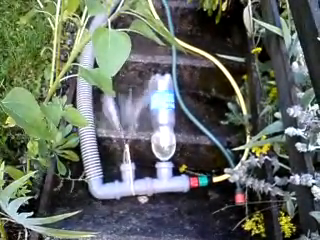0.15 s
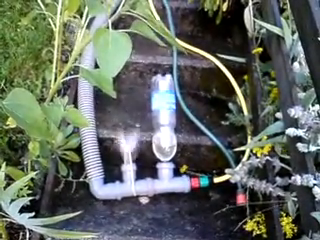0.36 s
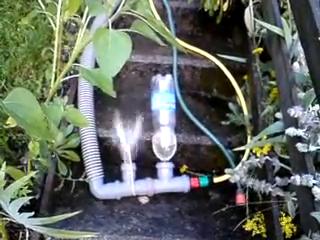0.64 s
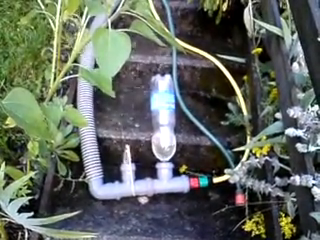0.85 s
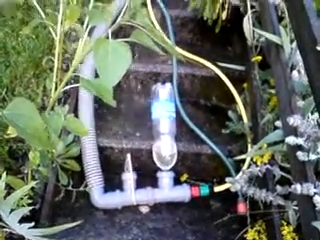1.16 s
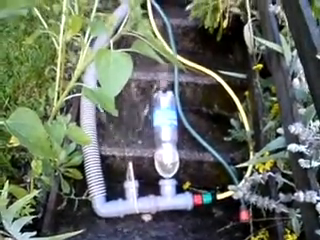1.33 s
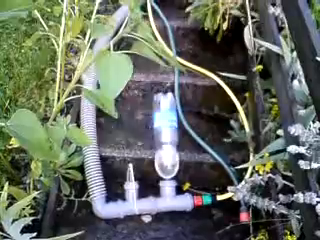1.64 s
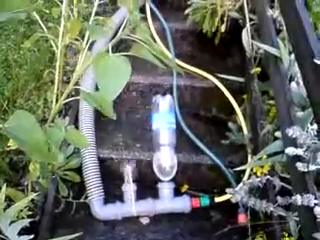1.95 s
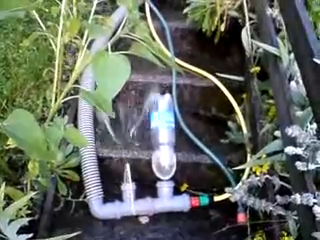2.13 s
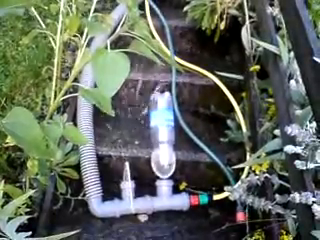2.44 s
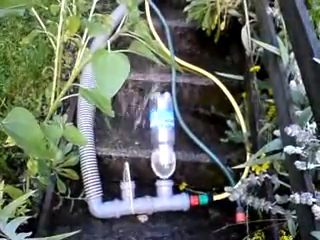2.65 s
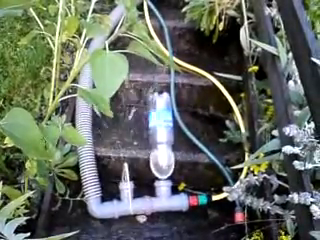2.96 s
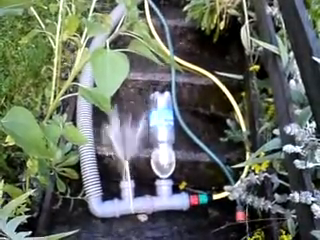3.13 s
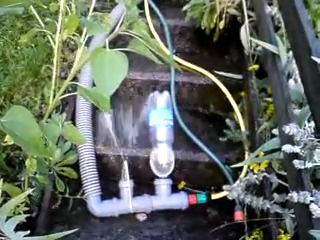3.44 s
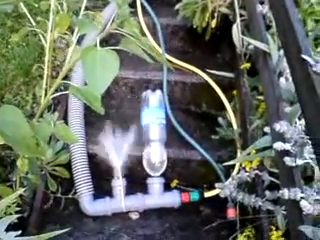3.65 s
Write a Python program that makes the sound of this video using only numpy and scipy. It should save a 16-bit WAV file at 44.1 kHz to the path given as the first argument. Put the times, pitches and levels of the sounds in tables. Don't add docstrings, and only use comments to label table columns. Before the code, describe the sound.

A small water ram pump clacks rapidly and steadily, spurting hissing water between each sharp knock

```python
import sys
import numpy as np
from scipy import signal
from scipy.fft import rfft, irfft
from scipy.io import wavfile
from scipy.ndimage import uniform_filter1d

SR = 44100
rng = np.random.default_rng(int(sys.argv[2]) if len(sys.argv) > 2 else 0)


def linear_from_db(decibels):
    return 10 ** (np.asarray(decibels, float) / 20)


def master_out(mix):
    frames = np.transpose(np.atleast_2d(mix))
    ceiling = np.clip(frames, -1, 1)
    pcm = np.round(ceiling * 32767).astype(np.int16)
    wavfile.write(sys.argv[1], SR, pcm)


N = 167139

# time in seconds, peak level in dB, loudest ring in Hz,
# level of the spurt before it in dB.
SLAMS = [(0.0428, -16.5, 3560, -34.5), (0.3192, -18.5, 2960, -35), (0.5876, -18, 3310, -37),
         (0.8619, -20.5, 3830, -35.5), (1.1338, -17.5, 3680, -36), (1.4042, -19.5, 3594, -36.5),
         (1.6766, -19.5, 3420, -35), (1.947, -20.5, 3800, -35.5), (2.2184, -17.5, 3700, -36),
         (2.4947, -16, 3730, -35.5), (2.7656, -20, 3730, -36.5), (3.035, -17.5, 3720, -35),
         (3.3159, -17, 3380, -34), (3.5892, -23.5, 3500, -34.5)]


def evened(x):
    return x / np.sqrt(np.mean(x ** 2) + 1e-20)


def colour(x, points):
    f, db = np.transpose(points)
    hz = np.fft.rfftfreq(len(x), 1 / SR)
    gain = linear_from_db(np.interp(np.log(hz + 1), np.log(f + 1), db, right=-90))
    return irfft(rfft(x) * gain, len(x))


def filtered(x, order, hz, kind):
    return signal.sosfilt(signal.butter(order, hz, kind, fs=SR, output="sos"), x)


def thin(x):
    return filtered(filtered(x, 4, 1822, "high"), 2, 5610, "low")


def add(mix, s, sound):
    at = round(s * SR)
    sound = sound[max(-at, 0):]
    part = mix[max(at, 0):][:len(sound)]
    part += sound[:len(part)]


def ring(modes, glide=0.):
    t = np.arange(3000) / SR
    return sum(linear_from_db(db - 60 * t / t60) * np.sin(2 * np.pi * hz * t * (1 + glide * t))
               for hz, db, t60 in modes)


def garden_air():
    # frequency in Hz, level in dB per Hz.
    tone = [(20, -13.5), (65, -7), (400, -18.5), (850, -10), (1450, -12), (1800, -5.5), (3550, 0),
            (8500, -22)]
    return linear_from_db(-54.5) * evened(colour(rng.standard_normal(N), tone))


def gurgle():
    out = np.zeros(N)
    fade_in = np.minimum(np.arange(3000) / 120, 1)
    spread = 0.15
    for s, *_ in SLAMS:
        for u, v, w in rng.random((12, 3)):
            hz = 851 * (1 + spread * (0.74 * u + 1.06 * v - 1))
            db = -46.5 - 8 * (1 - u) - 10 * w
            bubble = ring([(hz, db, 0.027)], glide=2.5)
            add(out, s + 0.008 + 0.055 * u ** 0.75, bubble * fade_in)
    return out


def ticks():
    # time in seconds, peak level in dB, ring in Hz.
    hits = [(0.0941, -28, 3750), (0.1238, -40, 3280), (0.1565, -34, 4230), (0.2249, -38, 3420),
            (0.71, -31.5, 3750), (0.7846, -51.5, 3600), (0.9852, -23, 4340), (0.9991, -24, 3600),
            (1.074, -43, 3510), (1.2208, -29.5, 2270), (1.353, -34, 3800), (1.597, -51, 4220),
            (1.7948, -31.5, 4180), (1.8657, -34.5, 4230), (2.0298, -55, 3530), (2.0683, -35.5, 3380),
            (2.1435, -32, 4180), (2.1854, -27.5, 3870), (2.3541, -22, 3670), (2.4404, -45.5, 3740),
            (2.6224, -22.5, 4030), (2.6634, -25.5, 3670), (2.8459, -33.5, 4230), (2.8792, -27, 4420),
            (3.1198, -30, 2750), (3.1682, -30, 3760), (3.257, -23.5, 3770), (3.4102, -31, 4380),
            (3.502, -33, 3730), (3.5271, -33, 3700)]
    out, t = np.zeros(N), np.arange(600) / SR
    splash = t * np.exp(-t / 0.001) + 0.00006 * np.exp(-t / 0.0092)
    for s, db, hz in hits:
        drive = rng.standard_normal(600) * splash
        body = ring([(hz, 0, 0.007), (hz * 1.7, -9, 0.005), (hz * 0.49, -13, 0.006)])[:900]
        drop = thin(np.convolve(drive, body))
        add(out, s - 0.001, linear_from_db(db) * drop / abs(drop).max())
    return out


def flow_power():
    # seconds from the slam, level in dB.
    swell = [
        (-.106, -10.5),
        (-.072, -15),
        (-.06, -4.5),
        (-.042, -1.5),
        (-.004, -0.5),
        (0.012, -2.5),
        (0.04, -11),
        (.068, -21.5),
        (0.139, -18),
    ]
    seconds, level = np.transpose(swell)
    t, power = np.arange(N) / SR, np.zeros(N)
    last_spurt = [(3.862, -34)]
    for s, db in [(row[0], row[3]) for row in SLAMS] + last_spurt:
        power += linear_from_db(2 * (db + np.interp(t - s, seconds, level, left=-60, right=-60)))
    return power


def droplets():
    per_s, spread_db = 2600, 1.5
    size = linear_from_db(spread_db * np.minimum(rng.exponential(1, N), 3.5)) * (rng.random(N) < per_s / SR)
    kind, t, out = rng.integers(0, 24, N), np.arange(220) / SR, np.zeros(N)
    for k, hz in enumerate(np.geomspace(900, 8500, 24)):
        shape = t * hz * np.exp(-t * hz / 2.5) * hz
        chirp = np.sin(2 * np.pi * hz * t * (1 + 30 * t)) * shape
        out += signal.oaconvolve(size * (kind == k), chirp)[:N]
    return out


def spurt():
    # frequency in Hz, level in dB per Hz.
    spray_tone = [(500, -28), (900, -29), (1550, -23), (1800, -16), (3000, -5), (3650, 1), (4500, -8),
                  (5500, -18.5), (8000, -21.5), (8900, -42.5)]
    flow = np.sqrt(uniform_filter1d(flow_power(), 200) + 1e-12)
    water = evened(droplets()) + linear_from_db(3) * rng.standard_normal(N)
    flicker = evened(uniform_filter1d(uniform_filter1d(rng.standard_normal(N), 200), 200))
    mist_tone = [(4000, -35), (4700, 16), (6500, 16), (8800, -18)]
    mist = evened(colour(rng.standard_normal(N), mist_tone))
    follows = 0.98
    fine = linear_from_db(-12.5) * (flow / linear_from_db(-33.5)) ** (follows - 1) * mist
    return flow * linear_from_db(2.5 * flicker) * (evened(colour(water, spray_tone)) + fine)


def puff():
    t, rise_s = np.arange(1500) / SR, 0.0042
    push = filtered(rng.standard_normal(1500), 2, [350, 1600], "band")
    return linear_from_db(-55.5) * evened(push) * t / rise_s * np.exp(1 - t / rise_s)


def thud(db, hz_spread):
    # frequency in Hz, level in dB, t60 in seconds.
    pipe = [(192.3, -51, 0.067), (487, -56, 0.044), (724.5, -41.5, 0.034), (980, -46, 0.045),
            (1370, -68, 0.012)]
    luck = rng.standard_normal((len(pipe), 2))
    modes = [(hz * (1 + hz_spread * u), level + db + 2 * v, t60)
             for (hz, level, t60), (u, v) in zip(pipe, luck)]
    soft = ring(modes) * (1 - np.exp(-np.arange(3000) / 70))
    return filtered(soft, 2, 130, "high")


def knock(peak_db, ring_hz, rise_s, fall_s):
    # frequency in Hz, level in dB, t60 in seconds.
    valve_body = [(2037, -29, 0.036), (2230, -41.5, 0.0033), (2640, -27.5, 0.023), (2956, -14, 0.029),
                  (3564, -17.5, 0.0027), (3750, -8, 0.022), (4150, -15.5, 0.0033), (4830, -19.5, 0.024),
                  (5590, -34, .007), (7140, -21.5, 0.0046)]
    t = np.arange(3000) / SR - 0.01
    tail_s, tail = 0.009, linear_from_db(-10)
    fading = (np.exp(-t / fall_s) + tail * np.exp(-t / tail_s)) / (1 + tail)
    shape = np.where(t < 0, np.exp(t / rise_s), fading)
    detune = 1 + 0.015 * rng.standard_normal(len(valve_body))
    modes = [(hz * d, db, t60) for (hz, db, t60), d in zip(valve_body, detune)]
    body = thin(ring(modes + [(ring_hz, 0, 0.011)]))
    shudder = signal.fftconvolve(rng.standard_normal(4000), body)[1000:4000]
    local_power = uniform_filter1d(shudder ** 2, 60)
    shudder = shape * shudder / np.sqrt(local_power + 0.28 * np.mean(shudder ** 2))
    blow = np.pad(body / abs(body).max(), (430, 0))[:3000]
    out = thin(shudder) + linear_from_db(-3) * blow
    return linear_from_db(peak_db) * out / abs(out).max()


def valve():
    # time in seconds, peak level in dB, loudest ring in Hz.
    clacks = [(0.194, -13.5, 3550), (0.4701, -13, 3634), (0.7398, -12, 3376), (1.0101, -14.5, 3413),
              (1.2837, -11.5, 3390), (1.5556, -15.5, 3424), (1.8255, -13, 3575), (2.0967, -11, 3524),
              (2.37, -11.5, 3583), (2.6435, -15, 3580), (2.9142, -13, 3896), (3.184, -13.5, 3630),
              (3.466, -12, 3410), (3.742, -12, 3840)]
    out = np.zeros(N)
    blow_s = 0.00049 - 0.01
    for s, db, hz in clacks:
        add(out, s + blow_s, knock(db, hz, rise_s=0.0017, fall_s=0.0024))
        add(out, s - 0.001, thud(-9.5, hz_spread=0.052))
        add(out, s - 0.002, puff())
    for s, db, hz, _ in SLAMS:
        add(out, s + blow_s, knock(db, hz, rise_s=0.0011, fall_s=0.002))
        add(out, s + 0.00065, thud(0, hz_spread=0.01))
    return out


def scene():
    return (garden_air() + gurgle() + ticks() + spurt() + valve())[None]


def starve(x):
    hz, t, z = signal.stft(x, SR, nperseg=256, noverlap=128)
    frames = len(t) // 8 * 8
    power = abs(z[:, :frames]) ** 2
    total = 10 * np.log10(power.sum(0).reshape(-1, 8) + 1e-14)
    jumps = np.ptp(total, 1) > 9.5
    peak_db = np.repeat(np.where(jumps, total.max(1), -200), 2)
    peak_db = peak_db - 25 * (total.reshape(-1, 4).max(1) > np.maximum(peak_db - 1, -32))
    keep = np.ones(z.shape)
    lowest_hz = 3600
    for lo in range(20, 52, 4):
        band_db = 10 * np.log10(power[lo:lo + 4].sum(0).reshape(-1, 4).mean(1) + 1e-14)
        luck_db = 8 * rng.standard_normal(len(band_db))
        limit_db = peak_db - 25 - 2.4 * (hz[lo] - lowest_hz) / 1000
        dead = band_db + luck_db < limit_db
        keep[lo:lo + 4, :frames] = 1 - np.repeat(dead, 4) * (hz[lo] > lowest_hz)
    return signal.istft(z * keep, SR, nperseg=256, noverlap=128)[1][:N]


def top_cut(x):
    return signal.sosfilt(signal.butter(12, 8910, fs=SR, output="sos"), x)


def record(dry):
    lowpass = signal.firwin(511, 8700, window=("kaiser", 9), fs=SR)
    band = signal.oaconvolve(starve(dry[0]), lowpass, "same")
    return top_cut(band[None])


dry = scene()
out = record(dry)
master_out(out)
```